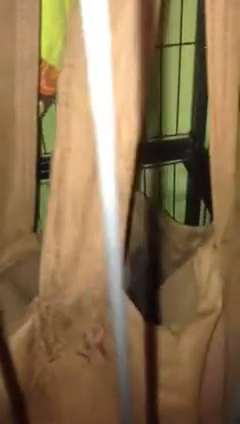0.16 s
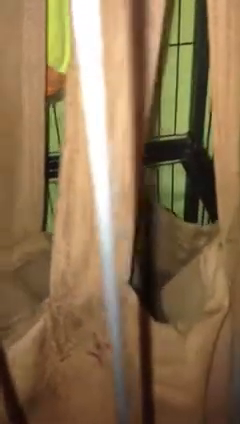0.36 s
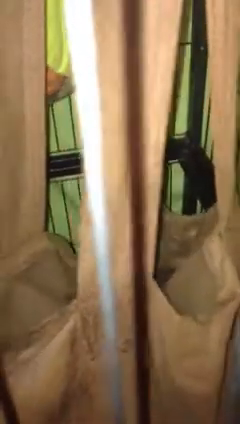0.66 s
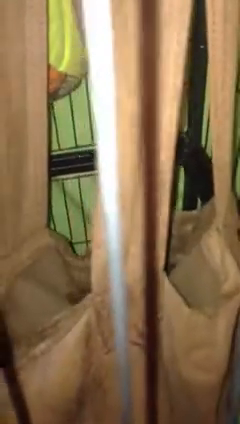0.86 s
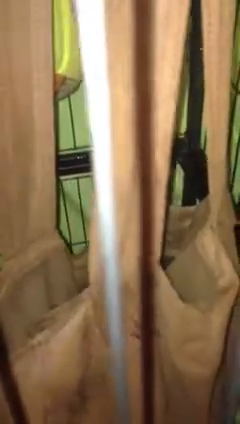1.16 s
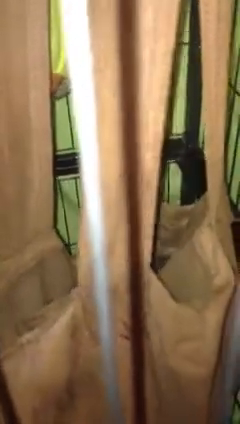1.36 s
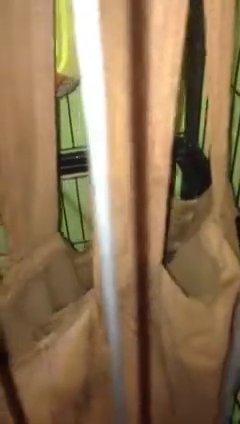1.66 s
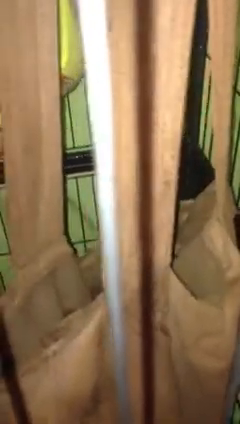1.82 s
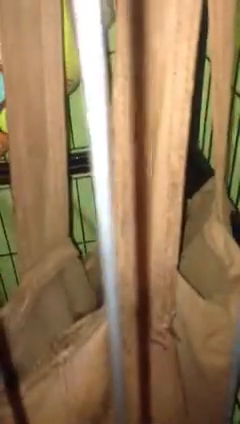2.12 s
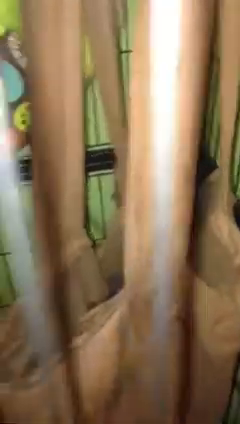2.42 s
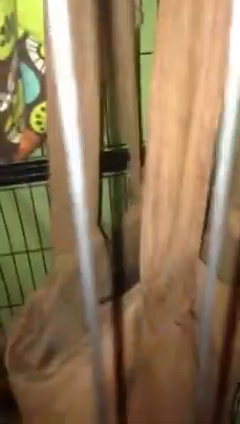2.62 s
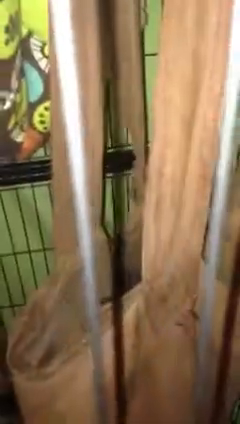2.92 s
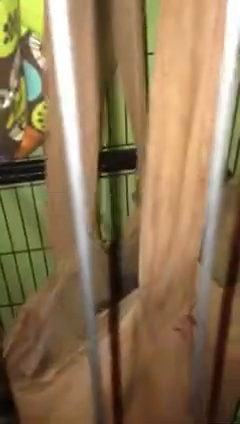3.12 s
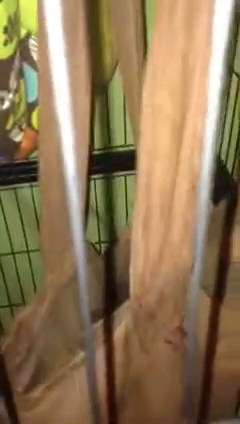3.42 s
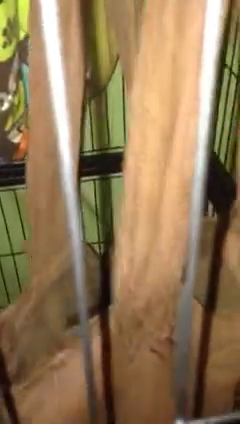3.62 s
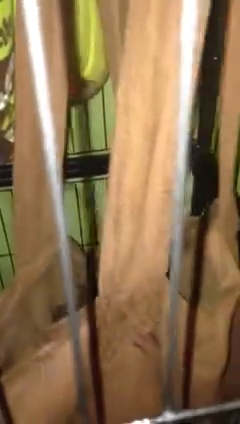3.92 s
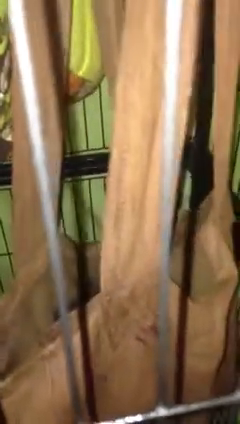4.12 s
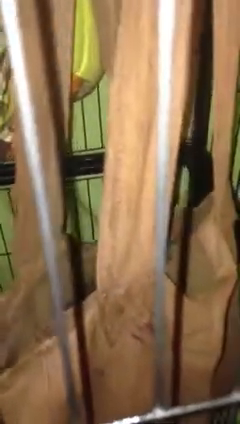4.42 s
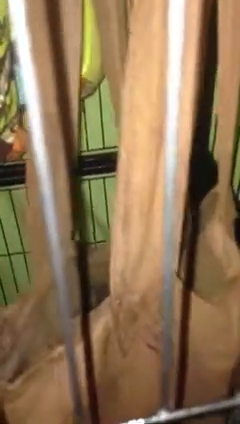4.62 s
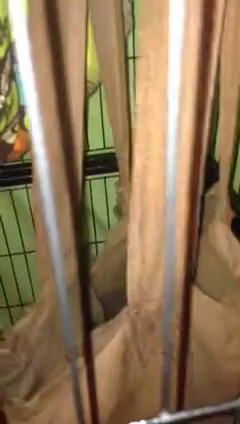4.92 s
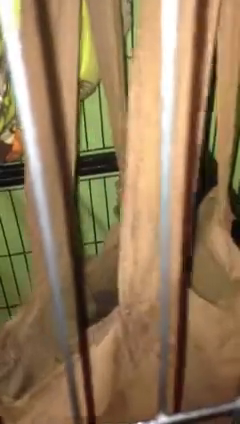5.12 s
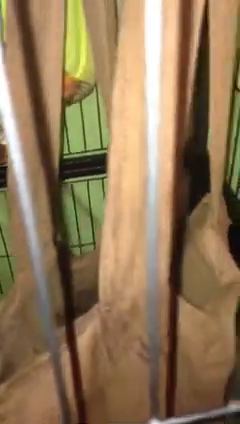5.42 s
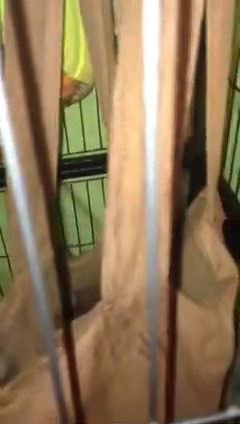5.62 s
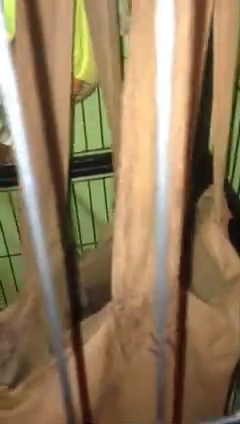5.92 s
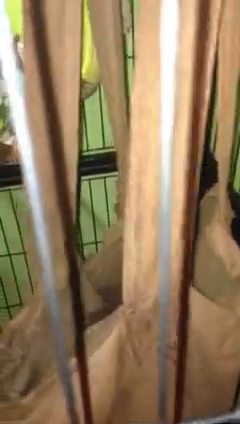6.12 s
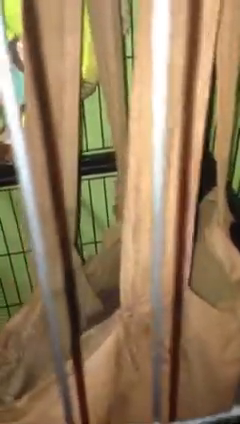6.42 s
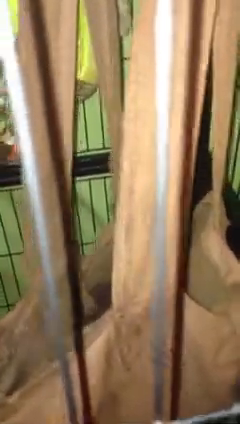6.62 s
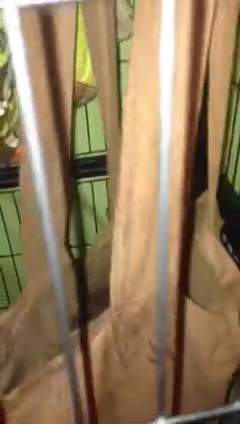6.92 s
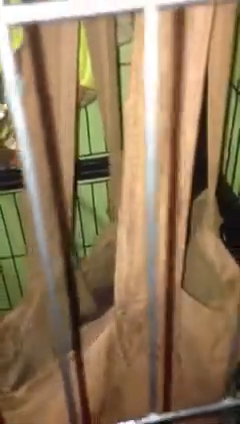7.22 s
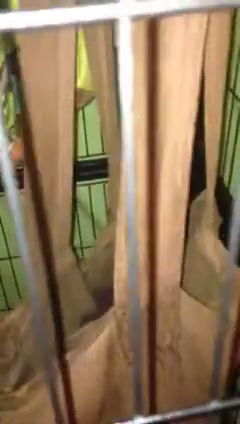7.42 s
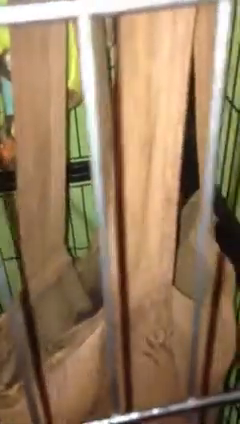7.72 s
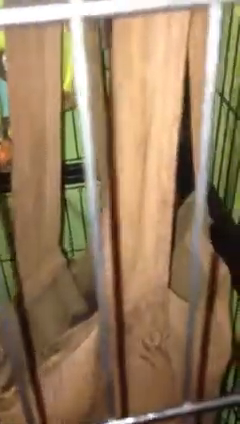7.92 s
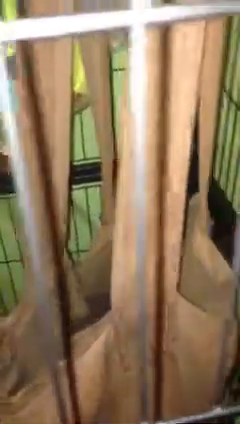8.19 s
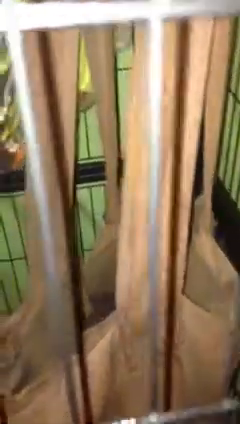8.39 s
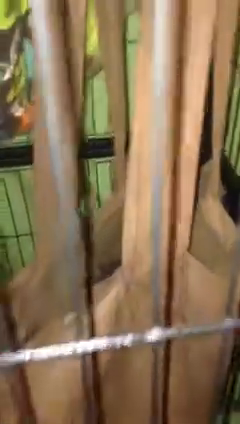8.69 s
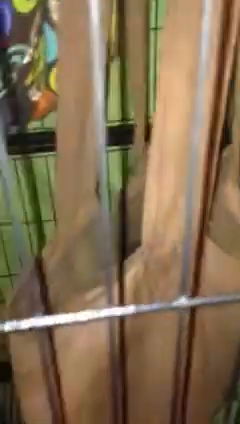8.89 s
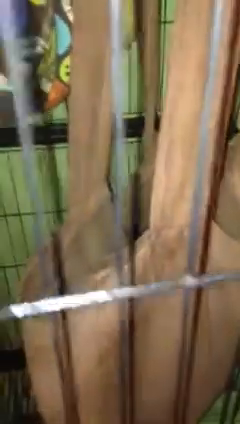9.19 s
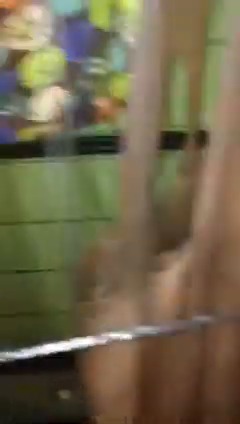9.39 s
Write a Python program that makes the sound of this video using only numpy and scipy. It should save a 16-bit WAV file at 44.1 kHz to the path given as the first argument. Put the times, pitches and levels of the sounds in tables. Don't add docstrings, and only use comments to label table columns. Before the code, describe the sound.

In a bare, echoing room, a small animal calls from a cloth hammock in a wire cage. From 0 s, faint thin squeaks come about three a second, each holding low briefly and then sweeping upward, heard mostly as reflections. Small claw scratches and soft taps are scattered beneath, with a sharper scrape on wire at 2 s. Around 2.5 s the calls turn shriller, and from 4.4 to 5.7 s they are stronger. From 5.7 s bright claw slips on cloth and wire become frequent, with a firm low knock at 6.5 s. The squeaks drop lower and shorter, ending near 8.5 s. Between 8 and 9 s loud, crackly scrabbling rings the bars, shakes the floor pan with a low hum and rustles the cloth, peaking with a snap at 8.8 s. It eases into small scrapes, knocks and soft rubbing by 9.5 s. Lumpy microphone-handling rumble and faint hush continue throughout.

```python
import sys
import numpy as np
from scipy import signal
from scipy.fft import rfft, irfft
from scipy.io import wavfile
from scipy.ndimage import uniform_filter1d

SR = 44100
rng = np.random.default_rng(int(sys.argv[2]) if len(sys.argv) > 2 else 0)


def gain_from_db(level_db):
    decades = np.asarray(level_db, float) / 20
    return 10 ** decades


def materialize(psi):
    bounded = np.clip(np.atleast_2d(psi).T, -1, 1)
    quanta = np.round(bounded * 32767).astype(np.int16)
    wavfile.write(sys.argv[1], SR, quanta)


N = 421155


def rms_one(x):
    return x / np.sqrt(np.mean(x ** 2) + 1e-20)


def at_hz(points, hz):
    points_hz, values = np.transpose(points)
    return np.interp(np.log(hz), np.log(points_hz), values)


def in_time(rows):
    s, *columns = np.transpose(rows)
    return [np.interp(np.arange(N) / SR, s, column) for column in columns]


def drift(rate):
    r = np.exp(-2 * np.pi * rate / SR)
    settle = 8000
    wobble = signal.lfilter([1], [1, -2 * r, r * r], rng.standard_normal(N + settle))
    return rms_one(wobble[settle:])


def coloured(spectrum):
    hz = np.fft.rfftfreq(N + 1, 1 / SR) + 1
    white = rfft(rng.standard_normal(N + 1))
    return rms_one(irfft(white * gain_from_db(at_hz(spectrum, hz)))[:N])


def lowpass(x, hz, order=2):
    return signal.sosfilt(signal.butter(order, hz, fs=SR, output="sos"), x)


def highpass(x, hz, order=2):
    return signal.sosfilt(signal.butter(order, hz, "high", fs=SR, output="sos"), x)


def split(x, low_hz, high_hz):
    dull, bright = lowpass(x, low_hz), highpass(x, high_hz)
    return dull, x - dull - bright, bright


def ring(x, hz, t60):
    r = gain_from_db(-60 / (max(t60, .002) * SR))
    w = 2 * np.pi * hz / SR
    return signal.lfilter([0, np.sin(w)], [1, -2 * r * np.cos(w), r * r], x + 1e-18)


# start_s, hold_s (below 0: begins mid-climb), climb_s, top_hz, level_db
STEEP = [
    (0.0, 0.059, 0.09, 1820, -56),
    (1.096, 0.046, 0.06, 1092, -57),
    (1.437, 0.079, .119, 1910, -57),
    (2.318, 0.073, 0.23, 3560, -57),
    (2.556, -0.26, 0.33, 4080, -48),
    (2.697, .06, .27, 3454, -51.5),
    (3.766, 0.061, 0.16, 2055, -54.5),
    (6.025, 0.073, 0.15, 1944, -51.5),
    (6.314, 0.084, 0.21, 3470, -53.5),
]
# start_s, hold_s, climb_s, top_hz, level_db
EVEN = [(2.104, 0.0096, 0.15, 2000, -58), (3.425, .03, .26, 2813, -56.5), (4.104, 0.046, 0.16, 2063, -55.5),
        (4.394, 0.07, 0.23, 2370, -51.5), (4.705, 0.058, .22, 3165, -50), (5.036, 0.068, 0.23, 3100, -48.5),
        (5.377, 0.046, 0.24, 2805, -51), (6.666, 0.044, 0.15, 1412, -54.5), (6.973, .06, .14, 1820, -49.5),
        (7.29, 0.059, .14, 1880, -53.5), (7.557, 0.066, 0.12, 1537, -51), (7.837, 0.051, 0.058, 960, -48),
        (8.098, 0.032, 0.036, 840, -44.5), (8.459, 0.029, 0.048, 1030, -52)]
# start_s, hold_s, climb_s, top_hz, level_db
STEADY = [
    (.266, .062, .25, 3043, -57),
    (.647, 0.09, 0.11, 1810, -56.5),
    (3.107, 0.063, 0.14, 2173, -52.5),
    (5.705, .08, 0.17, 2053, -49),
]
# time_s, pitch_hz
HOLD = [(0.0, 667.4), (1.1, 638), (2.15, 663.4), (2.7, 720), (3.15, 672), (4.75, 684), (5.1, 730.6),
        (6.1, 696), (8.5, 693)]


def squeaks():
    out = np.zeros((3, N))
    waver, shimmer = drift(51.4), drift(150)
    hold_hz, = in_time(HOLD)
    kinds = [(STEEP, (1.2, .47)), (EVEN, (1.55, .67)), (STEADY, (.66, .88))]
    calls = sorted((*row, *bend) for rows, bend in kinds for row in rows)
    for n, (s, hold, rise, top_hz, level_db, slow, bend) in enumerate(calls):
        at = np.arange(max(round(s * SR), 0), round((s + hold + rise + .015) * SR))
        t = at / SR - s
        left = t[-1] - t
        done = climb_done(np.clip((t - hold) / rise, 0, 1), slow, bend)
        height = np.log(hold_hz[at[0]] / 700) * (1 - done) + np.log(top_hz / 700) * done
        height += 0.0707 * np.exp(-t / 0.0247) * (1 - done)
        steepness = np.clip(np.gradient(height) * SR / 12, 0, 1)
        pitch = 700 * np.exp(height + (.004 + .009 * done + .055 * steepness) * waver[at])
        tone = throat(pitch, height, steepness, top_hz, shimmer, at)
        fade = np.clip(t / .006, 0, 1) * np.clip(left / .02, 0, 1)
        effort_db = level_db + 7.5 - 4 * np.clip(1 - t / abs(hold), 0, 1)
        effort_db -= 19 * np.clip(1 - left / 0.061, 0, 1)
        effort_db += (1.5 + 0.28 * steepness) * shimmer[at]
        out[n % 3, at] += tone * fade * gain_from_db(effort_db)
    return out


def climb_done(along, slow, bend):
    shoulder, creep, knee_s = 9, .14, 0.0227
    rush = (along / bend) ** slow
    done = (1 - creep) * rush / (1 + rush ** shoulder) ** (1 / shoulder) + creep * along
    return uniform_filter1d(done, max(int(knee_s * SR), 1), mode="nearest")


# freq_hz, gain_db
THROAT = [(600, -63), (1400, -3.5), (2100, -6.5), (2800, -5.5), (3600, 0.5), (4300, -9), (6500, -6),
          (8200, 13.5), (9500, 6.5), (12000, -79)]
# pitch_hz, gain_db
VOICE = [(650, -5), (850, 0), (1150, 2.3), (1600, -5), (2100, 0.6), (2900, -5), (3300, 4.5), (4100, 0)]


def throat(pitch, height, steepness, top_hz, shimmer, at):
    phase = 2 * np.pi * np.cumsum(pitch) / SR
    tone = np.sin(phase) * gain_from_db(at_hz(VOICE, pitch))
    thin_db = -5 - 5.75 * height - 1.67 * steepness
    mild = np.clip((3380 - top_hz) / 250, 0, 1)
    for k in range(2, 7):
        gain_db = thin_db + at_hz(THROAT, k * pitch) - 5.75 * (k - 2)
        gain_db += -8 * mild * np.clip(k * pitch / 1000 - 4, 0, 1)
        gain_db += 3 * np.roll(shimmer, 5000 * k)[at]
        tone += gain_from_db(gain_db) * np.sin(k * phase) * (k * pitch < 15000)
    return tone


# start_s, level_db, bright_db, drag_s
ON_WIRE = [(0.597, -54, 6, 0.021), (0.647, -61.5, -26, 0.015), (1.516, -42.5, 6, 0.0065),
           (1.635, -59.5, 0, 0.011), (1.856, -53.5, 3, 0.012), (2.043, -28, 2, 0.017),
           (5.733, -56, -14, 0.01), (6.047, -39.5, 3, 0.013), (6.087, -26, -9, 0.0033),
           (6.238, -35.5, 1, 0.03), (6.393, -39.5, -5, 0.0036), (6.609, -52, -13, 0.0017),
           (6.881, -27, -26, 0.0077), (7.093, -41.5, 6.5, 0.027), (7.97, -22, 4, 0.034),
           (8.249, -20.5, 4.5, 0.032), (8.363, -23, 3, 0.039), (8.456, -29, 2.5, 0.039),
           (8.643, -34, -11, 0.017), (8.764, -36, -9, 0.012), (8.951, -23.5, 3.5, 0.0063),
           (9.089, -47.5, -8, 0.032), (9.296, -33.5, 8, 0.0014), (9.511, -42.5, -14, 0.024)]
THROUGH_CLOTH = [(0.303, -50, 2.5, 0.0047), (4.108, -50, -10, 0.0055), (5.171, -42.5, -2, 0.022),
                 (5.627, -40, -1, 0.002), (5.748, -26.5, 1.5, 0.018), (6.155, -39, -1, 0.0071),
                 (6.273, -25.5, 2.5, 0.016), (6.638, -45, -23, 0.0047), (6.725, -33, 3, 0.0072),
                 (6.787, -34, 2, 0.019), (7.175, -33.5, 6, 0.019), (7.689, -45, 4.5, 0.056),
                 (8.075, -20, 5.5, 0.017), (8.295, -24.5, -1.5, 0.053), (8.52, -29.5, -0.5, 0.042),
                 (8.7861, -14.5, 0.5, 0.0087)]
ON_CLOTH = [(0.814, -49.5, 1.5, 0.035), (0.906, -56, -0.5, 0.078), (1.066, -56.5, -1, 0.023),
            (1.2414, -51, 0.5, 0.024), (1.919, -47.5, 4, 0.0056), (2.034, -47, -8, 0.0041),
            (2.323, -61, -2, 0.033), (2.73, -66, -10, 0.03), (3.373, -57.5, -26, 0.0083),
            (3.987, -54, 2, 0.04), (4.261, -59.5, -7, 0.0022), (4.625, -49.5, -2, 0.038),
            (4.677, -44.5, 1, 0.043), (4.817, -55.5, 1, 0.05), (5.297, -39, -2, 0.0068),
            (5.367, -42, -10, 0.012), (5.548, -52, 0, 0.016), (6.455, -48.5, -12, 0.0049),
            (6.505, -37, -1, 0.028), (6.84, -39, -2, 0.024), (7.154, -38, -14, 0.053),
            (7.337, -47, 0, 0.03), (7.589, -63, 5, 0.0054), (7.654, -43.5, 4.5, 0.036),
            (7.809, -52, -6, 0.075), (7.866, -41, -6, 0.022), (7.893, -42, -6, 0.63),
            (9.334, -35, -6, 0.034)]
# freq_hz, density_db
SLIP_COLOUR = [(410, -18), (700, -27.5), (1770, -16.5), (2270, -17.5), (4610, -1), (6070, 0), (7110, 0.5),
               (13500, -15), (15400, -19), (16000, -85)]


def slips():
    t = np.arange(SR // 4) / SR
    force = np.zeros((3, N + SR))
    for rows, dull_db in (ON_WIRE, -14.5), (THROUGH_CLOTH, -11.5), (ON_CLOTH, -4.5):
        for s, level_db, bright_db, drag in rows:
            drag = max(drag, .001)
            snap = 1 + 0.0022 / drag * np.exp(-t / 0.0008)
            dying = gain_from_db(-60 * np.maximum(t - .7 * drag, 0) / (.025 + 2.5 * drag))
            shape = np.clip(t / .0004, 0, 1) * snap * dying
            gains = gain_from_db(level_db + np.array([dull_db + 14.5, -2.5, bright_db + 0.5]))
            i = round(s * SR)
            force[:, i:i + len(t)] += gains[:, None] * shape
    grains = gain_from_db(2.5 * drift(250))
    scrape = split(coloured(SLIP_COLOUR), low_hz=2400, high_hz=9170)
    return grains * np.sum(force[:, :N] * scrape, axis=0)


# pitch_hz, spread_hz, level_db, t60_s
BARS = [(1060, 40, -21, .1), (1790, 60, -17, .1), (3150, 150, -15, .06), (4640, 120, -10, .1),
        (5050, 200, -8, .055), (5900, 500, -12, .04), (6880, 200, -17, .04), (8550, 300, -4, .05),
        (11300, 200, -8, .04), (13000, 500, -11, .035)]


def bars(drive, count=6):
    out = np.zeros(N)
    for hz, spread_hz, db, t60 in BARS:
        caught = drive * gain_from_db(db - 38 + 3 * drift(5))
        out += sum(ring(caught, hz + spread_hz * o, t60) for o in rng.uniform(-1.1, 1, count))
    return out


# start_s, peak_db, pitch_hz, t60_s
KNOCKS = [
    (0.242, -51.5, 594, 0.035),
    (1.048, -47, 1990, 0.031),
    (5.3, -40.5, 870, 0.017),
    (6.506, -40, 693, 0.044),
    (7.173, -46, 1310, 0.039),
    (7.656, -45, 490, 0.031),
    (8.083, -55, 1300, 0.023),
    (8.951, -49, 1806, 0.44),
    (9.268, -57, 1235, 0.38),
    (9.335, -39, 1048, 0.17),
]


def knocks():
    out = np.zeros(N)
    for s, peak_db, hz, t60 in KNOCKS:
        i = round(s * SR)
        blow = np.zeros(4000)
        blow[0] = gain_from_db(peak_db)
        click = sum(ring(blow, click_hz, .008) for click_hz in (650, 950, 1300, 1700, 2200))
        out[i:i + 4000] += 1.27 * ring(blow, hz, t60) + 0.81 * click
    return out


# start_s, level_db, length_s
PAN = [
    (6.289, -51, 0.056),
    (7.989, -52, 0.12),
    (8.26, -56, 0.03),
    (8.348, -52, 0.044),
    (8.478, -55, 0.056),
    (8.698, -56, 0.025),
    (9.35, -71, 0.039),
]


def pan():
    shake = np.zeros(N)
    for s, level_db, length in PAN:
        shake[round(s * SR):round((s + length) * SR)] = gain_from_db(level_db - 23.5)
    return highpass(ring(shake * rng.standard_normal(N), hz=283, t60=.12), 200)


# time_s, rustle_db, dull_db
CLOTH = [
    (0.0, -71.5, -5),
    (4.65, -70.5, 4),
    (6.12, -56.5, -5.5),
    (6.22, -52.5, -5),
    (7.18, -65, -1),
    (7.47, -64.5, 6),
    (8.38, -44, -3),
    (9.23, -57.5, 2.5),
    (9.55, -55.5, 8.5),
]
# freq_hz, density_db
RUSTLE = [(180, -23), (300, -6.5), (1230, 0), (3460, -5.5), (6100, -6.5), (11500, -15.5), (15200, -27),
          (16000, -63)]


def cloth():
    rustle_db, dull_db = in_time(CLOTH)
    dull, middle, bright = split(coloured(RUSTLE), low_hz=2470, high_hz=9000)
    clumps_db = 3.2 * drift(24) + 0.47 * drift(300)
    return (gain_from_db(dull_db) * dull + middle + bright) * gain_from_db(rustle_db + clumps_db)


# centre_s, level_db, length_s
HAND = [(0.597, -73, 0.071), (0.85, -63.5, 0.3), (1.204, -76, 0.14), (2.18, -59, 0.21), (2.502, -68, 0.18),
        (2.853, -64, 0.21), (3.27, -70, 0.064), (4.013, -77, 0.071), (4.753, -55.5, 0.21),
        (5.284, -72.5, 0.76), (6.088, -75, 0.16), (6.566, -69, 0.34), (7.204, -54.5, 0.12),
        (7.723, -58, 0.2), (8.323, -62, 0.5), (8.87, -67, 0.26), (9.207, -63, 0.066), (9.402, -58.5, 0.16)]
# freq_hz, density_db
RUMBLE = [(24, -72), (40, -42), (70, -31), (141, 1.5), (209, 1.5), (325, 0), (600, -6), (780, -3),
          (1320, -120)]


def hand():
    t = np.arange(N) / SR
    swell = sum(gain_from_db(db) * np.exp(-(2 * (t - s) / length) ** 2) for s, db, length in HAND)
    grip = gain_from_db(-71)
    return coloured(RUMBLE) * (grip + swell) * gain_from_db(2.0 * drift(12))


# freq_hz, density_db
HUSH = [(15, -52), (25, -52), (70, -15), (161, -9), (714, -9), (1040, 1), (1370, -11.5), (7710, -13),
        (10100, -22), (14400, -6.5), (16000, -26)]


def hush():
    return gain_from_db(-72) * coloured(HUSH)


# freq_hz, t60_s
ROOM_T60 = [(300, 0.47), (1000, 0.51), (3000, 0.73), (6000, 0.32), (14000, 0.26)]


def room(x, near_db, size=SR // 2):
    t, white, echo = np.arange(size) / SR, rng.standard_normal(size), 0
    for low in 125 * 2. ** np.arange(7):
        band = signal.sosfilt(signal.butter(2, [low, 2 * low], "band", fs=SR, output="sos"), white)
        t60 = np.clip(at_hz(ROOM_T60, 1.4 * low), .05, .42)
        echo = echo + band * (gain_from_db(-60 * t / t60) + gain_from_db(near_db - 60 * t / .09))
    echo *= np.clip(t / .002, 0, 1)
    return signal.oaconvolve(x, echo / np.sqrt(np.sum(echo ** 2)))[:N]


def through_hammock(voices, through_hz=760):
    heard = gain_from_db(-0.5) * lowpass(voices.sum(axis=0), through_hz, order=4)
    thin = signal.butter(1, through_hz / 2, "high", fs=SR)
    for voice in voices:
        heard += gain_from_db(-11) * voice + room(signal.lfilter(*thin, voice), near_db=9)
    return heard


def scene():
    heard_voice = through_hammock(squeaks())
    claws = slips()
    claws = highpass(claws + bars(claws), 650, order=4)
    claws += highpass(knocks(), 300)
    heard_claws = claws + gain_from_db(-2.5) * room(claws, near_db=-69)
    return (heard_voice + heard_claws + pan() + cloth() + hand() + hush())[None]


def top_cut(x):
    return signal.sosfilt(signal.butter(12, 16640, fs=SR, output="sos"), x)


def record(dry):
    return top_cut(dry)


dry = scene()
out = record(dry)
materialize(out)
```